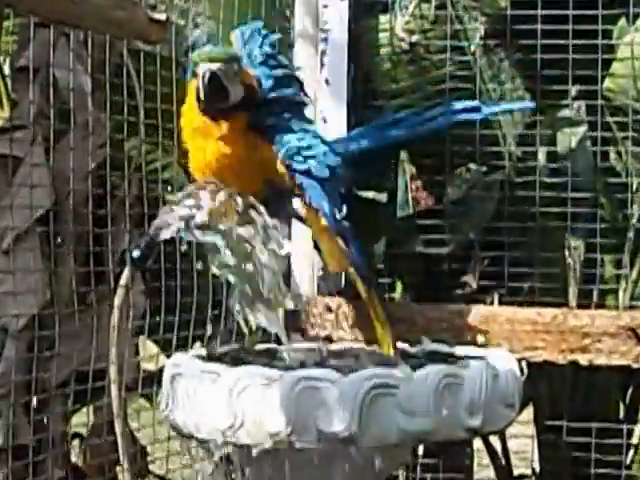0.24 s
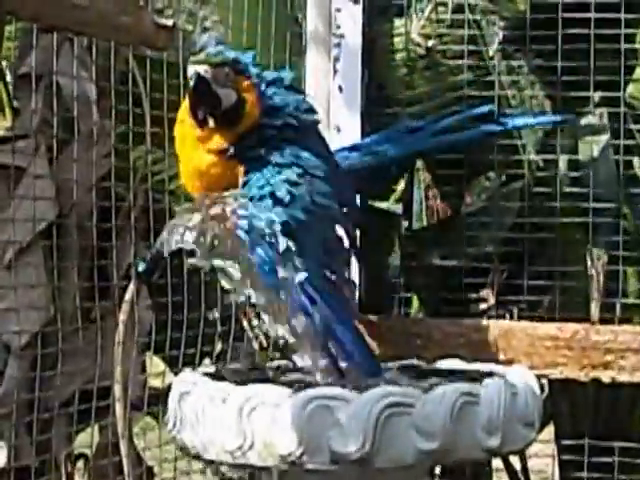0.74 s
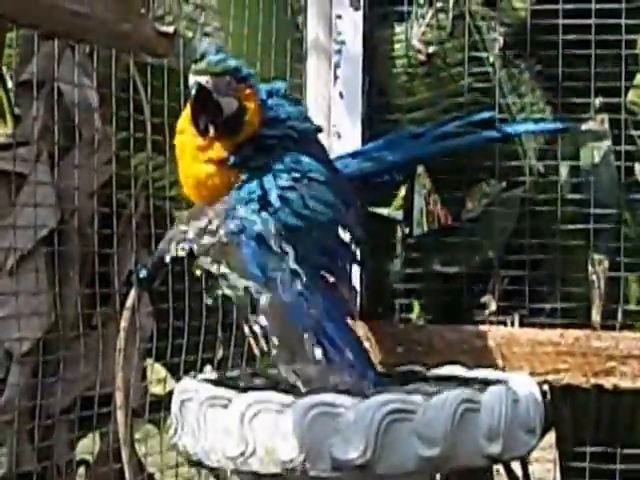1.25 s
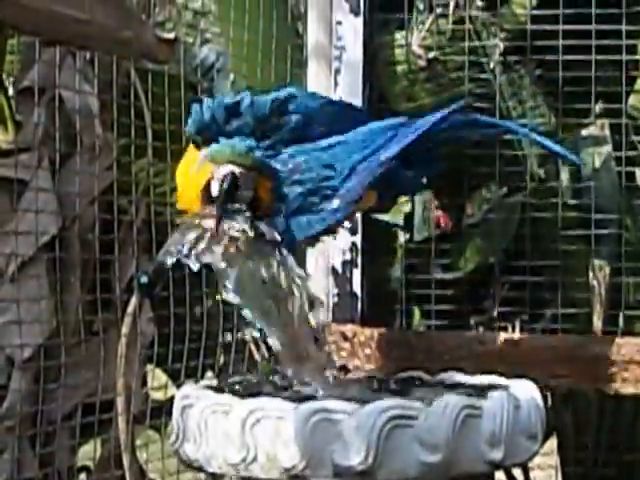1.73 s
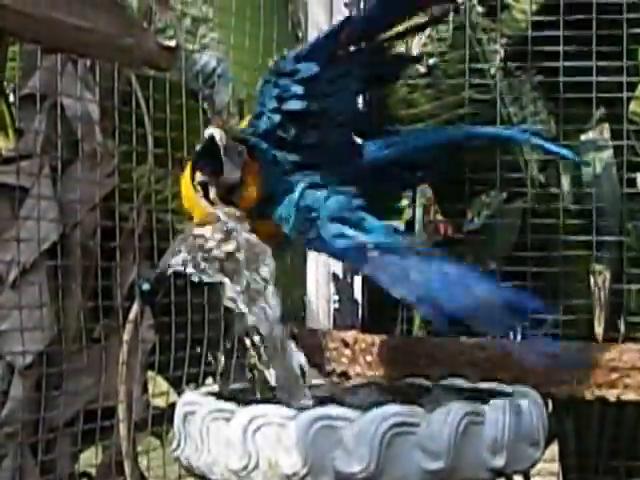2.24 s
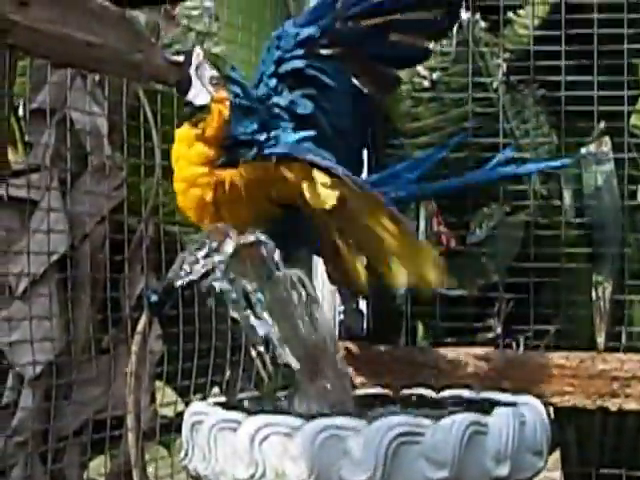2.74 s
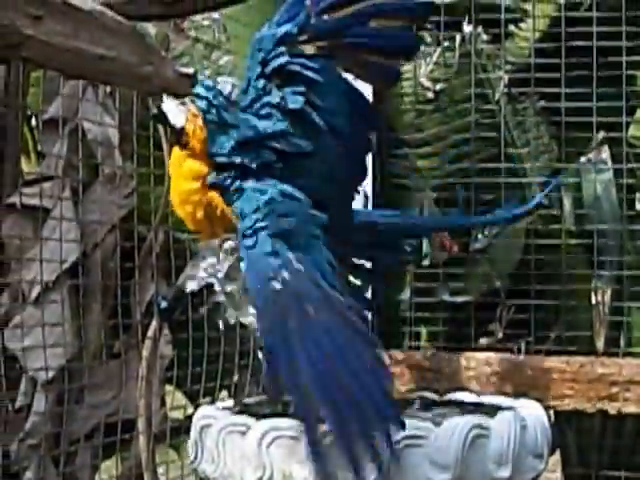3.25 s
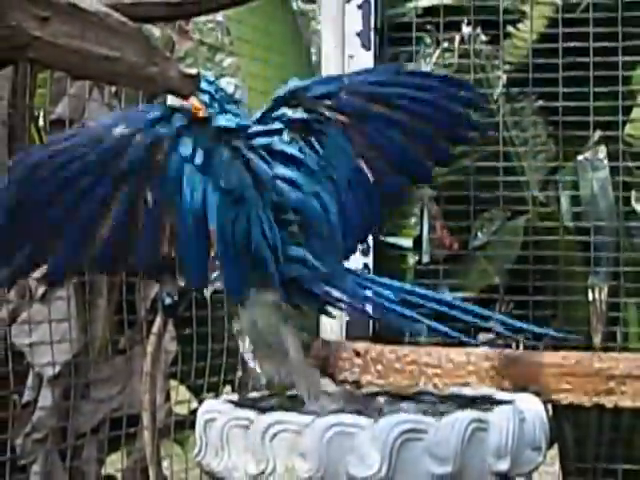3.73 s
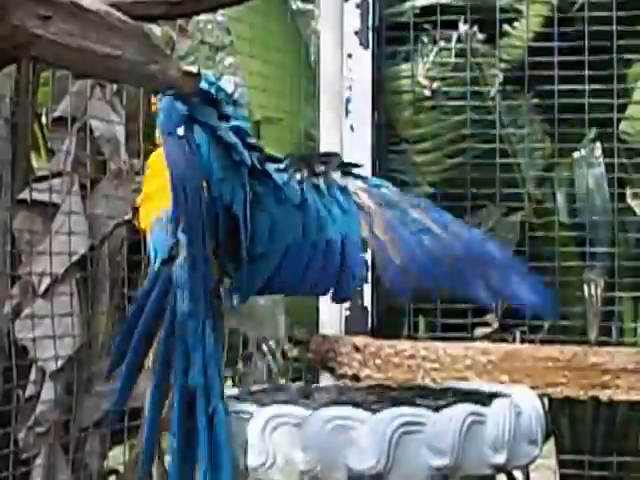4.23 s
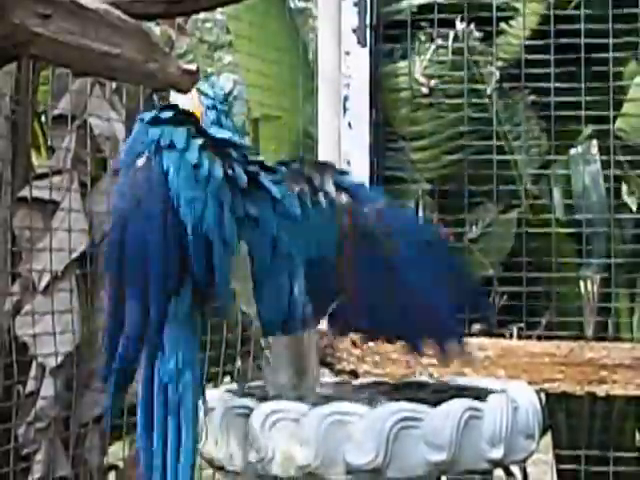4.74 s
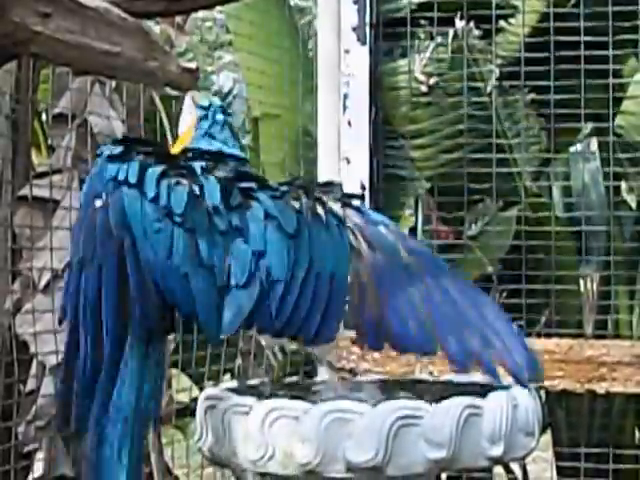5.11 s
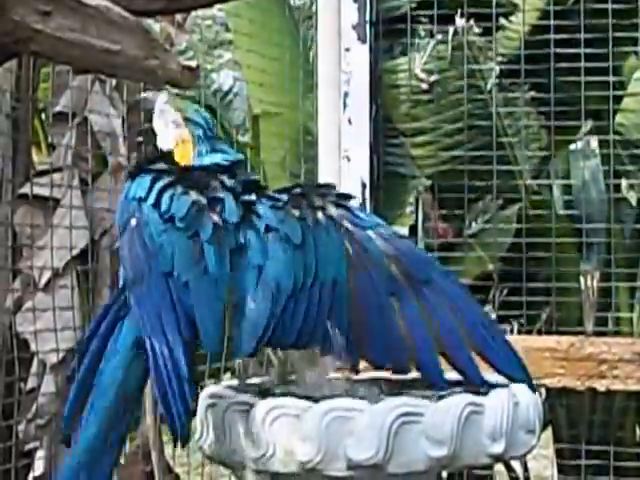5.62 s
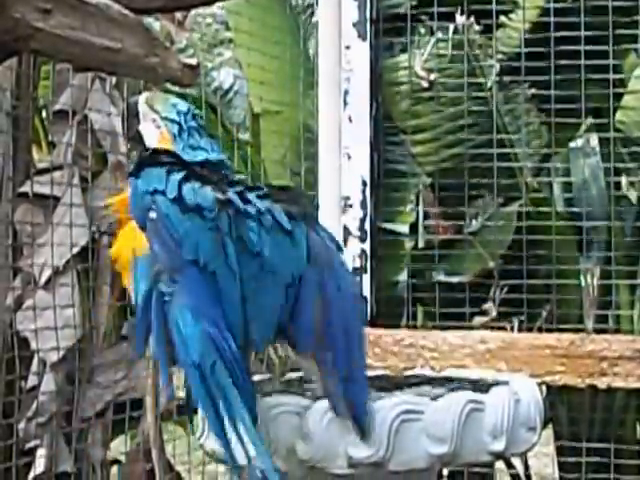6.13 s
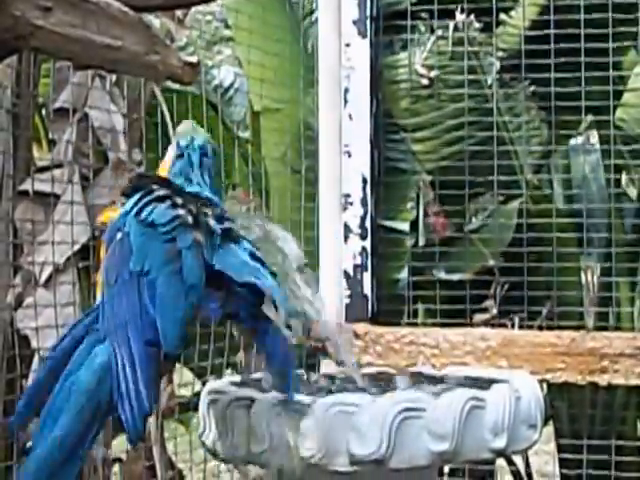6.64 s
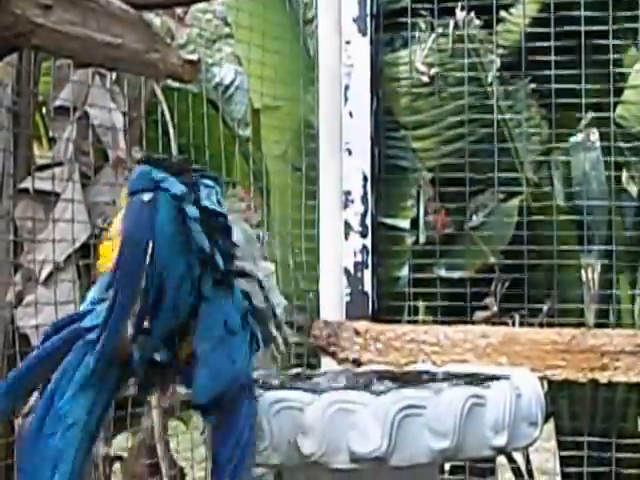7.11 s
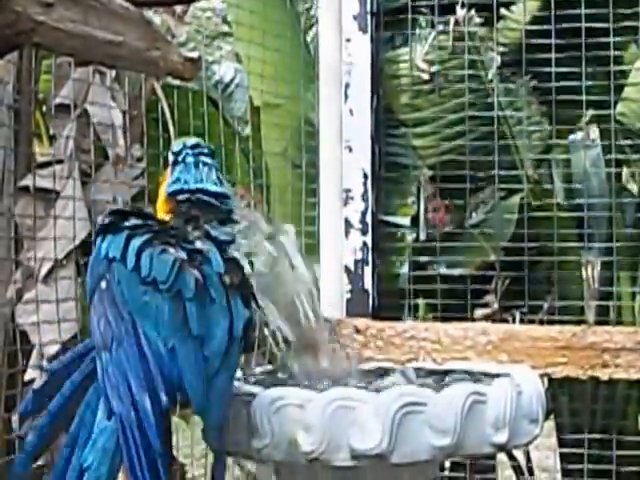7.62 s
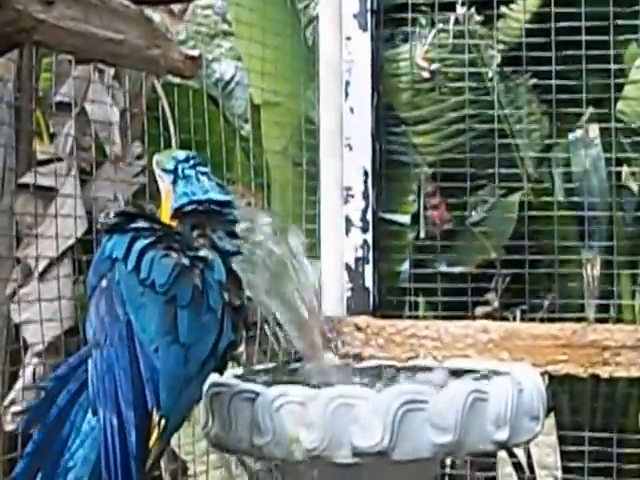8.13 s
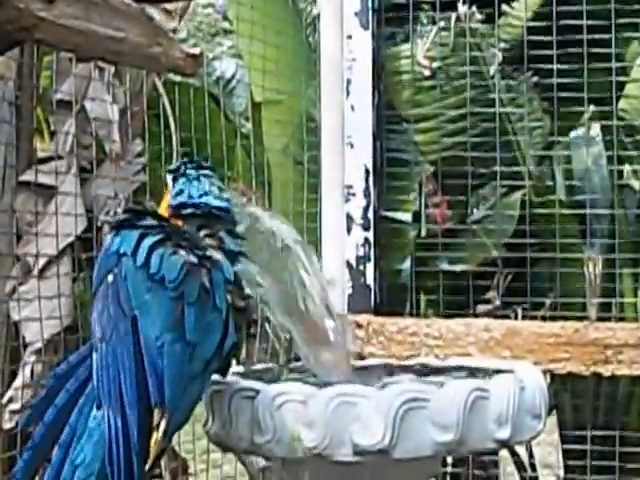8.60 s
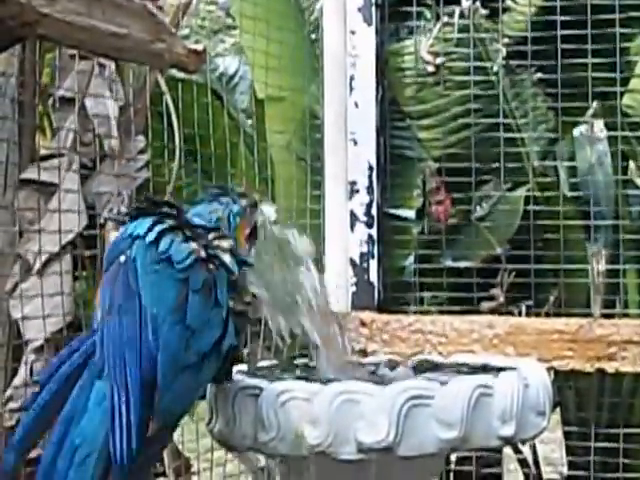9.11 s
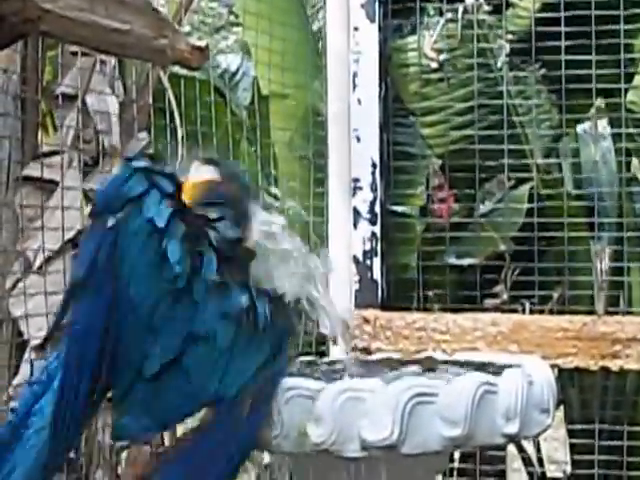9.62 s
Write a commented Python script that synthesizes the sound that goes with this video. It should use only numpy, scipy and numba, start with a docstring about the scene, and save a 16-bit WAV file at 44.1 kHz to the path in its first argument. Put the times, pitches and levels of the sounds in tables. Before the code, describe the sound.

In an outdoor aviary, water from a hose splashes steadily into a stone birdbath, with irregular bright slaps and small bubbles. Over it a parrot squawks twice in the first two seconds, first hoarse and breathy, then rising from a growl to a harsh screech. A sharp, close snap hits during the first call. The splashing continues, with a dull bump and one soft wingbeat late on, heard from a few metres through a small, bright-sounding microphone.

```python
"""Macaw bathing under a hose

In an outdoor aviary a hose jet spatters, slaps and bubbles into a stone birdbath, which rings low. The macaw in
it ends one hoarse squawk, then growls up into a harsher one: fluttering overtones and breath, shaped by throat
and beak. A small camera microphone, bright between 2 and 5 kHz, stands a few metres off; a snap close to it
clips, and near the end come a dull bump and a wingbeat that stirs the air low."""
import sys
import numpy as np
from scipy import signal
from scipy.fft import rfft, irfft
from scipy.io import wavfile
from scipy.ndimage import uniform_filter1d
from numba import njit

SR = 44100
rng = np.random.default_rng(int(sys.argv[2]) if len(sys.argv) > 2 else 0)


def unload_wav(signal):
    """Save mono or channel-first audio to the path in sys.argv[1] as 16-bit WAV at rate SR, clipped to [-1, 1]."""
    wavfile.write(
        sys.argv[1],
        SR,
        np.round(np.clip(np.atleast_2d(signal).T, -1, 1) * 32767).astype(np.int16),
    )


N = 434826
CALLS_END = int(2.2 * SR)

# spectrum of spray at the microphone: (frequency [Hz], level [dB])
SPRAY_SPECTRUM = [(760, -50), (1300, -14), (2050, -6.5), (2310, -0.5), (2880, 0), (3810, -5.5), (4650, 0.5),
                  (5270, -2), (5590, -9), (6020, -18.5), (6820, -17), (7180, -25), (7560, -69.5),
                  (9830, -71), (16600, -120)]


def undb(db):
    """Decibels to gain."""
    return 10 ** (np.asarray(db) / 20)


def unit(x):
    """Scale to rms 1."""
    return x / np.sqrt(np.mean(x ** 2))


def curve(table):
    """One curve over time for each column after the first; end values hold."""
    times, *columns = np.transpose(table)
    return [np.interp(np.arange(N) / SR, times, column) for column in columns]


def during(table, fade_s=0.011):
    """Gate open from the first row to the last, with short fades."""
    start, end = table[0][0], table[-1][0]
    return np.interp(np.arange(N) / SR, [start - fade_s, start, end, end + fade_s], [0, 1, 1, 0])


def colour(x, points, size=2048):
    """Minimum-phase filter through (frequency [Hz], level [dB]) points."""
    hz, db = np.transpose(points)
    log_gain = np.interp(np.log(np.fft.rfftfreq(size, 1 / SR) + 1), np.log(hz), db) * np.log(10) / 20
    cepstrum = irfft(log_gain)
    cepstrum[1:size // 2] *= 2
    cepstrum[size // 2 + 1:] = 0
    return signal.fftconvolve(x, irfft(np.exp(rfft(cepstrum))))[:len(x)]


def noise(spectrum, size=2048):
    """Coloured noise of rms 1."""
    return unit(colour(rng.standard_normal(N), spectrum, size))


def walk(rate_hz):
    """Smooth random drift of rms 1."""
    hold = max(int(SR / rate_hz), 1)
    steps = np.repeat(rng.standard_normal(N // hold + 1), hold)
    return unit(uniform_filter1d(uniform_filter1d(steps, hold), hold)[:N])


def sizes(chance, spread_db, most_db):
    """Uniform draws to levels: many small, few large, none huge."""
    return np.minimum(-spread_db * np.log(1 - chance), most_db)


@njit
def grains(n, start, size, step, decay, glide):
    """Damped, gliding sines; each swells in over its first cycle."""
    out = np.zeros(n)
    for g in range(len(start)):
        gain, speed, phase, i = size[g], step[g], 0., start[g]
        while gain > .003 * size[g] and i < n:
            out[i] += gain * np.sin(phase) * min(phase / (2 * np.pi), 1.)
            phase += speed
            speed *= glide[g]
            gain *= decay[g]
            i += 1
    return out


def ring(times, db, hz, t60, rise=0.):
    """Struck resonances that die away, gliding by `rise` octaves a second."""
    hz, t60, rise = (np.full(len(times), value) for value in (hz, t60, rise))
    decay, glide = 1000. ** (-1 / (t60 * SR)), 2. ** (rise / SR)
    return grains(N, (times * SR).astype(np.int64), undb(db), 2 * np.pi * hz / SR, decay, glide)


def bursts(times, db, t60):
    """Envelope of sudden rises that die away."""
    out = np.zeros(N)
    for start, peak, fall in zip((times * SR).astype(int), undb(db), t60 * SR):
        tail = peak * 1000. ** (-np.arange(min(int(fall), N - start)) / fall)
        out[start:start + len(tail)] += tail
    return out


def yard(rumble_db=-62.5, hum_hz=142):
    """Low outdoor rumble, a faint far hum and a late low stir of air from the wingbeat."""
    # rumble of the open air: (frequency [Hz], level [dB])
    rumble_spectrum = [(12, -37), (20, 0), (53, -2.5), (182, -7), (400, -6.5), (520, -34.5), (880, -120)]
    # swell of the hum: (time [s], level [dB])
    hum_levels = [(3.8, -78), (4.6, -67.5), (7.2, -70), (9.86, -78)]
    # rise of the air stirred by the wing: (time [s], level [dB])
    stir_levels = [(9.2, -83), (9.5, -61), (9.86, -59)]
    hum_phase = 2 * np.pi * np.cumsum(hum_hz * (1 + .004 * walk(2.4))) / SR
    hum = np.sin(hum_phase) * undb(curve(hum_levels)[0])
    stir = noise([(15, -4.5), (30, 3), (55, -9), (110, -41.5)], size=8192) * undb(curve(stir_levels)[0])
    rumble = noise(rumble_spectrum, size=8192) * undb(rumble_db + 2.3 * walk(2.8))
    return rumble + hum + stir


def bump():
    """A dull bump on the camera: two low rings that fall in pitch."""
    # rings of the body: (time [s], level [dB], pitch [Hz], t60 [s], rise [octaves/s])
    modes = [(8.9, -40.5, 188, 0.21, -6.5), (8.905, -37.5, 113, 0.26, -7)]
    return ring(*np.transpose(modes))


def squeak(throb_hz=23.5, crest_s=.772):
    """A thin, nearly steady tone whose octave beats."""
    # course of the squeak: (time [s], pitch [Hz], level [dB], octave level [dB])
    course = [(.71, 1762, -50, -50), (.73, 1766, -38, -39), (.775, 1790, -47, -33), (.81, 1770, -54, -45),
              (.93, 1770, -60, -46)]
    hz, db, octave_db = curve(course)
    phase = 2 * np.pi * np.cumsum(hz) / SR
    beat = np.cos(np.pi * throb_hz * (np.arange(N) / SR - crest_s))
    tone = undb(db) * np.sin(phase) + undb(octave_db) * beat * np.sin(2 * phase)
    return np.sqrt(2) * during(course) * tone


def wing(peak_s=9.52, peak_db=-44, rise_db_per_s=50, fall_db_per_s=80):
    """A wing pushes air in one soft, fluttering whoosh."""
    air = noise([(250, -45), (450, -0.5), (650, 3.0), (1000, -4), (1500, -7), (2500, -45)])
    t = np.arange(N) / SR - peak_s
    swell_db = np.minimum(rise_db_per_s * t, -fall_db_per_s * t)
    return air * undb(peak_db + swell_db + 0.68 * walk(40))


def basin(hz=276, t60=0.082, faint_db=-68):
    """The stone basin rings low under heavy drops: some clear knocks, many faint ones."""
    # the heaviest drops: (time [s], level [dB])
    knocks = [(0.456, -40), (0.629, -48), (1.575, -40.5), (2.535, -47), (2.656, -48), (3.419, -43),
              (5.254, -43.5), (5.442, -44), (6.949, -40.5), (7.631, -47), (7.876, -45), (8.065, -44),
              (8.897, -41), (9.094, -37.5), (9.205, -46)]
    when, detune, size = rng.random((200, 3)).T
    faint = ring(when * N / SR, sizes(size, 4.1, 8.3), hz * (0.947 + 0.074 * detune), t60)
    return unit(faint) * undb(faint_db) + ring(*np.transpose(knocks), hz, t60)


def bubbles(t60_cycles=66):
    """Each bubble rings for the same number of cycles while its pitch climbs."""
    # the clearest bubbles: (time [s], level [dB], pitch [Hz], rise [octaves/s])
    plops = [(.718, -44, 458, 3.1), (.931, -39, 451, 5.3), (1.27, -40, 523, 1.8), (2.285, -38, 504, 16),
             (2.382, -45, 385, 2.4), (3.136, -34.5, 1090, 4.1), (3.215, -38.5, 880, 1.5),
             (4.117, -35.5, 494, 0.43), (4.245, -37, 655, 31), (4.536, -39, 658, .71),
             (4.841, -41, 610, 5.9), (6.088, -36.5, 790, 6.8), (6.655, -41.5, 890, 5.4),
             (6.946, -38, 920, 2.9), (7.016, -41.5, 516, 1.7), (7.085, -39.5, 606, 15),
             (7.366, -39, 800, 5), (8.665, -43.5, 540, 4.9), (8.735, -38, 1110, 3.9),
             (9.088, -44, 558, 2.7), (9.16, -41, 1060, 3.6)]
    times, db, hz, rise = np.transpose(plops)
    return ring(times, db, hz, t60_cycles / hz, rise)


def sloshes():
    """Water sloshes in soft-edged bursts of spray."""
    # surges of water: (peak time [s], level [dB], half width [s])
    surges = [(4.575, -47, 0.016), (5.445, -42, 0.028), (5.645, -44, 0.0083), (6.535, -38.5, .018),
              (7.09, -44.5, .025), (7.27, -38.5, 0.031), (7.455, -42, 0.016), (9.215, -41.5, 0.014)]
    t = np.arange(N) / SR
    swell = sum(undb(db) * np.exp(-((t - peak_s) / width) ** 2) for peak_s, db, width in surges)
    return swell * noise(SPRAY_SPECTRUM)


def jet():
    """The hose jet lands: droplets ring briefly over a spattering hiss; small bubbles gurgle below."""
    # strength of the jet: (time [s], spray level [dB], gurgle level [dB])
    flow = [(.78, -41, -49), (1.15, -46, -52), (1.36, -42.5, -47), (2.15, -43, -50.5), (2.68, -44.5, -54.5),
            (3.25, -45, -51), (3.55, -44, -55), (3.96, -43.5, -50.5), (4.56, -42.5, -53.5),
            (5.0, -44.5, -54), (6.0, -44.5, -53.5), (6.9, -44.5, -54), (7.25, -43, -51), (7.65, -44, -51),
            (8.55, -42.5, -52.5), (9.2, -45, -53.5), (9.86, -44.5, -51.5)]
    # spectrum of the churned water: (frequency [Hz], level [dB])
    gurgle_spectrum = [(190, -30.5), (330, -6), (365, -10), (420, -11), (498, -4), (573, -3.5), (1080, 3),
                       (1320, -5.5), (1500, -5.5), (1950, -22.5), (3300, -120)]
    spray_db, gurgle_db = curve(flow)

    when, pitch, size = rng.random((9000, 3)).T
    hz = 1500 * 5 ** pitch
    drops = ring(when * N / SR, sizes(size, 3.5, 13.), hz, t60=30. / hz)
    when, length, size = rng.random((1600, 3)).T
    spatter = bursts(when * N / SR, sizes(size, 3., 10.), t60=.015 + .06 * length)
    hiss = unit(colour(rng.standard_normal(N) * (0.92 + unit(spatter)), SPRAY_SPECTRUM))
    patter = unit(colour(drops * undb(2.6 * walk(45)), SPRAY_SPECTRUM))
    spray = unit(patter + undb(3.0) * hiss)

    when, pitch, size = rng.random((4000, 3)).T
    hz = 380 * 3.74 ** pitch
    froth = ring(when * N / SR, sizes(size, 4.05, 12.7), hz, t60=37.0 / hz, rise=2.1)
    gurgle = unit(unit(colour(froth, gurgle_spectrum)) + undb(-2.0) * noise(gurgle_spectrum))
    return spray * undb(spray_db) + gurgle * undb(gurgle_db)


def faint_slaps(per_s=4, db=-36.5, spread_db=1.5, dull_hz=2640, bright_hz=4610, bright_share=.3):
    """Weaker slaps fall at random, some dull and some bright: rows of time, level and centre."""
    when, size, kind, detune = rng.random((per_s * N // SR, 4)).T
    hz = np.where(kind < bright_share, bright_hz, dull_hz) * (.88 + .24 * detune)
    return np.transpose([when * N / SR, db + spread_db * size, hz])


def slaps(spray_cycles=196, pitch_spread=0.14, smear_s=.004):
    """Water slaps on water, stone and feathers: a burst of spray, a crack and four short rings each."""
    # the clearest slaps: (time [s], level [dB], centre [Hz])
    clear_slaps = [(0.698, -23, 4900), (0.7976, -28, 3550), (0.8375, -20.5, 3480), (1.054, -23, 2870),
                   (1.238, -27.5, 4940), (1.298, -31, 2980), (2.633, -22.5, 2330), (3.1348, -28, 2820),
                   (3.3633, -29, 2600), (3.4143, -25, 2840), (3.5537, -22.5, 4500), (3.588, -27, 3080),
                   (3.698, -22, 4760), (3.8287, -28, 4450), (4.0223, -29, 2830), (4.0996, -29, 3280),
                   (4.4, -22, 2430), (4.5705, -23.5, 2470), (4.6049, -24, 3010), (4.7696, -27.5, 2620),
                   (5.0796, -26.5, 2780), (5.118, -28, 2350), (5.3256, -28, 2430), (5.4212, -19.5, 2300),
                   (5.671, -25, 2330), (5.7713, -29, 3150), (5.8006, -20, 4540), (5.9015, -26, 2470),
                   (5.921, -28, 2360), (6.0902, -31, 2330), (6.193, -22, 2230), (6.4198, -26.5, 2880),
                   (6.6672, -26, 2830), (7.057, -25.5, 2900), (7.114, -25, 2600), (7.2406, -28, 2870),
                   (7.277, -24.5, 3200), (7.427, -25.5, 3020), (7.4443, -23.5, 2490), (7.5567, -28, 2820),
                   (7.9204, -26, 2380), (8.3689, -29, 2250), (8.6143, -23, 4650), (8.7246, -24, 4700),
                   (8.7864, -30, 2560), (9.0514, -24.5, 4810), (9.143, -29, 2410), (9.208, -28, 2470),
                   (9.433, -24.5, 4740), (9.5428, -23.5, 3100), (9.7098, -27, 2250)]
    spray_db, crack_db, ring_db = -16., -.5, -7.5  # relative to the slap's level
    rows = np.vstack([clear_slaps, faint_slaps()])
    times, db, hz = rows.T
    spray = bursts(times, db + spray_db, t60=spray_cycles / hz) * noise(SPRAY_SPECTRUM)
    crack = ring(times, db + crack_db, hz, t60=13.0 / hz)
    times, db, hz = np.repeat(rows, 4, axis=0).T
    lag, loss, detune = rng.random((len(times), 3)).T
    ring_hz = hz * np.exp(pitch_spread * (2 * detune - 1))
    cluster = ring(times + smear_s * lag, db + ring_db - 6 * loss, ring_hz, t60=0.27 * spray_cycles / hz)
    return spray + crack + cluster


def snap():
    """A sharp snap close to the microphone: a few very short rings, thinned in the bass."""
    # rings of the snap: (time [s], level [dB], pitch [Hz], t60 [s])
    modes = [(.1559, -4, 4950, .006), (.15631, .6, 4950, .005), (.1568, -5, 3050, .013),
             (.1562, -17, 6900, .005), (.1555, -15, 420, .01)]
    low_cut = signal.butter(2, 400, "high", fs=SR, output="sos")
    return signal.sosfilt(low_cut, ring(*np.transpose(modes)))


def held_call(name, attack_db=16, release_db=30):
    """Attack, hold and release of a call whose pitch sags steadily, as rows for the syrinx."""
    # voice of each call: (level [dB], release [dB/s], pitch [Hz], sag [Hz/s], breathy share [0-1])
    voices = {"squawk": (-19, 102, 472, 18, 0.56), "screech": (-15, 282, 350, 81, 0.28),
              "held": (-20, 601, 337.5, 1, 0.34)}
    # timing of each call: (start [s], full level [s], release [s])
    timings = {"squawk": (-.1, -.05, .39), "screech": (1.772, 1.797, 1.968), "held": (1.775, 1.795, 2.005)}
    level_db, release_rate, pitch_hz, sag, breath = voices[name]
    times = np.array([*timings[name], timings[name][-1] + release_db / release_rate])
    db = level_db - np.array([attack_db, 0, 0, release_db])
    return np.transpose([times, pitch_hz - sag * (times - times[0]), db, np.full(4, breath)])


def syrinx(course, jitter, flutter_hz, steady):
    """A chaotic voice and its gain: overtones part steady, part fluttering; breath puffs once a cycle."""
    hz, db, breath = (column[:CALLS_END] for column in curve(course))
    phase = 2 * np.pi * np.cumsum(hz * (1 + jitter * walk(40)[:CALLS_END])) / SR
    flutter = walk(flutter_hz) + 1j * walk(flutter_hz)
    tones = 0
    for k in range(1, 24):
        own_flutter = np.roll(flutter, -9001 * k)[:CALLS_END]
        amplitude = steady + np.sqrt((1 - steady ** 2) / 2) * own_flutter
        tones += np.real(amplitude * np.exp(1j * (k * phase + 2 * np.pi * rng.random())))
    puffs = unit(rng.standard_normal(CALLS_END) * (1 + .5 * np.cos(phase)))
    # breath spreads over the whole band, the overtones over about a third of it
    voice = np.sqrt(1 - breath) * unit(tones) + np.sqrt(3 * breath) * puffs
    return voice, undb(db) * during(course)[:CALLS_END]


def squawk():
    """The end of a hoarse, breathy call, shaped by throat and beak."""
    # resonances of throat and beak: (frequency [Hz], level [dB])
    throat = [(180, -37.5), (300, -38.5), (596, -18.5), (893, -9.5), (1340, -12), (1900, 0), (2110, 1),
              (2390, -6.5), (2880, -4), (3300, -10), (3980, -5.5), (5010, -16), (7500, -42), (9750, -75.5),
              (16500, -120)]
    voice, gain = syrinx(held_call("squawk"), jitter=.004, flutter_hz=150, steady=.66)
    return gain * unit(colour(voice, throat))


def growl(beak_opens_s=(1.514, 1.608)):
    """A growl breaks up to a higher pitch as it swells, and brightens as the beak opens."""
    # course of the growl: (time [s], pitch [Hz], level [dB], breathy share [0-1])
    course = [(1.35, 253, -51, 0.19), (1.405, 249.5, -36, 0.4), (1.465, 250.6, -34.5, 0.6),
              (1.52, 406.6, -33.5, 0.7), (1.6, 417, -28, .55), (1.7, 415.4, -31.5, 0.96),
              (1.77, 423, -26.5, 0.6), (1.8, 420, -37, 0.5)]
    # resonances before and after the beak opens: (frequency [Hz], level [dB])
    closed_throat = [(300, -29.5), (500, -14), (750, 3), (1000, -2.5), (1250, -10.5), (1600, -2),
                     (2000, -10), (2600, -3), (3200, -12), (4400, -22), (7500, -40), (9700, -55)]
    open_throat = [(400, -40), (820, -5), (1200, -8), (1650, -10.5), (2450, 0), (2950, -2.5), (3500, -8),
                   (3900, -11), (4200, 2.5), (4600, -7.5), (5600, -11), (7500, -36), (9700, -74)]
    voice, gain = syrinx(course, jitter=.003, flutter_hz=130, steady=.7)
    opening = np.interp(np.arange(CALLS_END) / SR, beak_opens_s, [0, 1])
    dark = np.sqrt(1 - opening) * unit(colour(voice, closed_throat))
    bright = np.sqrt(opening) * unit(colour(voice, open_throat))
    return gain * (dark + bright)


def screech(throb_hz=26, throb_db=10., throb_fade_s=.07, crest_s=1.8):
    """The harsher squawk has two voices at once: one holds, the other sags and throbs at first."""
    # resonances of throat and beak for each voice: (frequency [Hz], level [dB])
    held_throat = [(300, -51), (500, -43), (680, -20.5), (1020, -13.5), (1350, -15), (1700, -18), (2030, 1),
                   (2400, -12.5), (3000, -9.5), (3900, -11), (4390, 0.5), (4800, -9), (6300, -29),
                   (9700, -71)]
    harsh_throat = [(300, -53.5), (500, -52), (680, -17), (1020, -19.5), (1350, -21.5), (1700, -19.5),
                    (2030, 0), (2400, -2.5), (2750, 3.5), (3100, -7.5), (3700, -11), (4000, -11.5),
                    (4330, -2), (4800, -6), (5500, -9.5), (6300, -17), (7500, -36), (9700, -83.5)]
    voice, gain = syrinx(held_call("held"), jitter=.002, flutter_hz=110, steady=.8)
    held = gain * unit(colour(voice, held_throat))
    voice, gain = syrinx(held_call("screech"), jitter=.002, flutter_hz=200, steady=.7)
    since = np.maximum(np.arange(CALLS_END) / SR - crest_s, 0)
    dip_db = throb_db * np.exp(-since / throb_fade_s) * np.sin(np.pi * throb_hz * since) ** 2
    return held + gain * undb(-dip_db) * unit(colour(voice, harsh_throat))


def wall_echo(sound, t60=0.35, db=-12.5, delay_s=.02):
    """The nearby walls return a short, diffuse tail."""
    t = np.arange(SR // 2) / SR
    tail = rng.standard_normal(len(t)) * 1000. ** (-t / t60) * (t > delay_s)
    return undb(db) * signal.fftconvolve(sound, tail / np.sqrt(np.sum(tail ** 2)))[:N]


def scene():
    """The aviary from a few metres, in mono: calls and snap echo off the walls, the rest is dry."""
    macaw = np.pad(squawk() + growl() + screech(), (0, N - CALLS_END))
    loud = macaw + snap()
    echo = wall_echo(loud)
    water = jet() + slaps() + basin() + bubbles() + sloshes()
    return (loud + echo + water + squeak() + wing() + yard() + bump())[None]


def record(dry):
    """The camera cuts the top steeply, clips on the snap and ducks just after; faint hiss lies higher."""
    top_hz, hiss_top_hz, hiss_db = 7550, 15500, -96
    duck_above, duck_db, duck_s = .8, 4.5, .011
    cut = signal.sosfilt(signal.ellip(8, .5, 75, top_hz, fs=SR, output="sos"), dry)
    pole = np.exp(-1 / (duck_s * SR))
    overload = signal.lfilter([1], [1, -2 * pole, pole ** 2], 1. * (np.abs(cut) > duck_above))
    ducked = cut * undb(-duck_db * overload / (overload.max() + 1e-9))
    clipped = np.clip(ducked + undb(hiss_db) * rng.standard_normal(dry.shape), -1, 1)
    return signal.sosfilt(signal.ellip(8, .1, 60, hiss_top_hz, fs=SR, output="sos"), clipped)


dry = scene()
out = record(dry)
unload_wav(out)
```